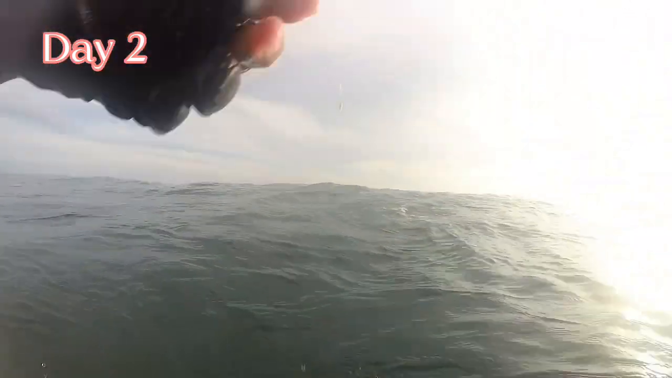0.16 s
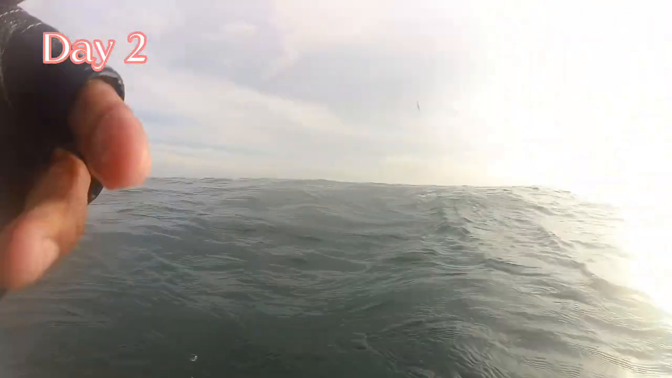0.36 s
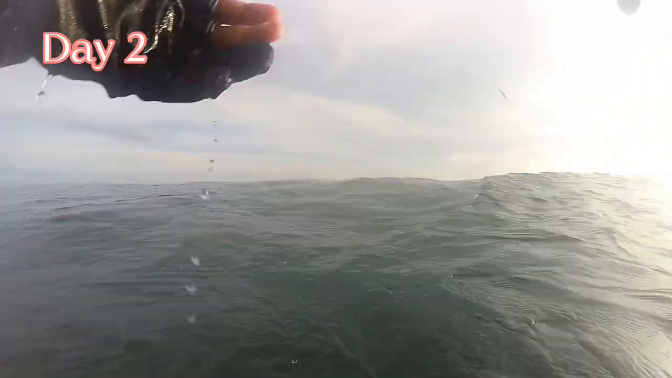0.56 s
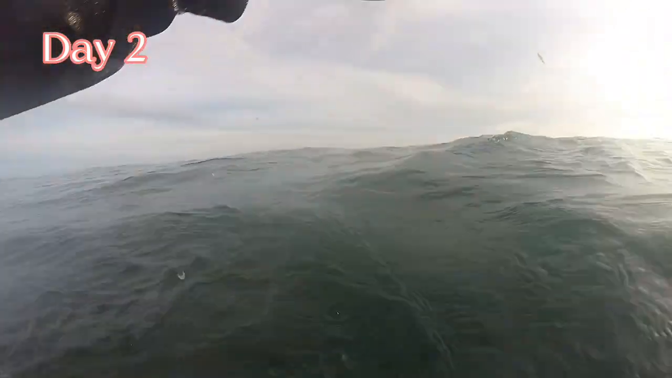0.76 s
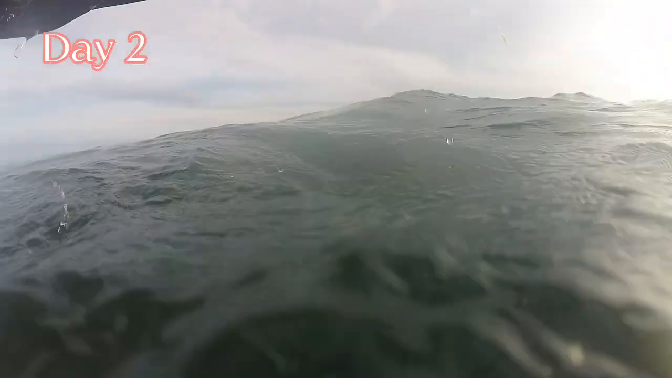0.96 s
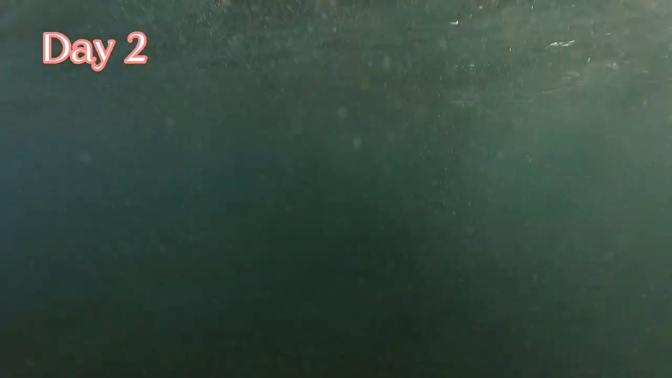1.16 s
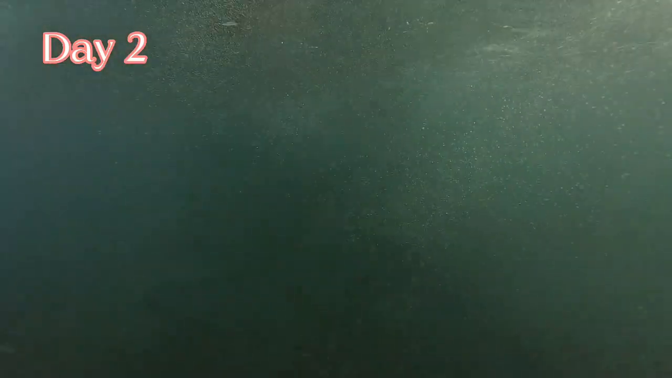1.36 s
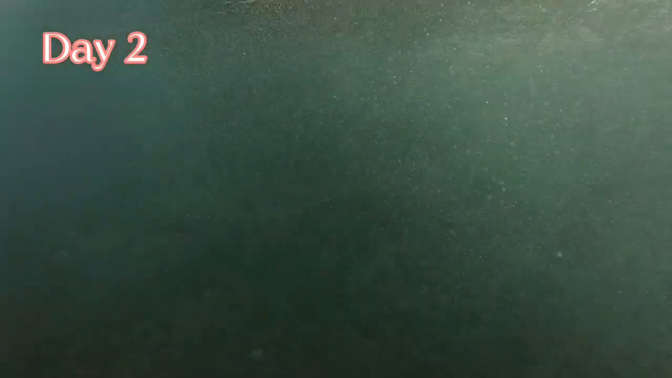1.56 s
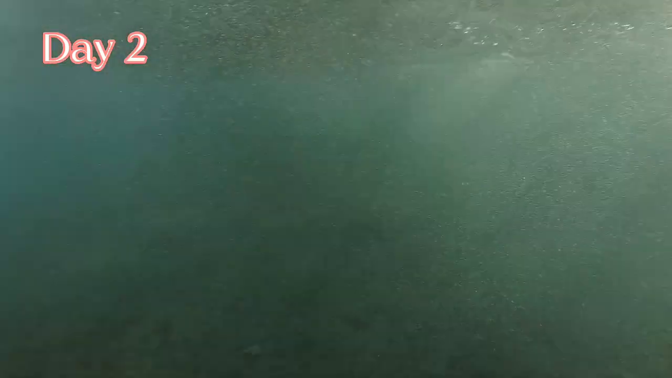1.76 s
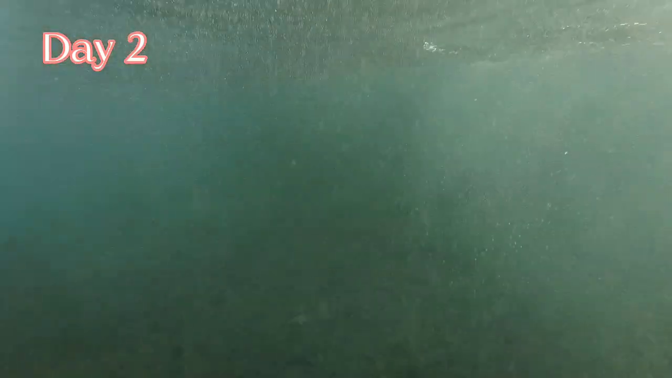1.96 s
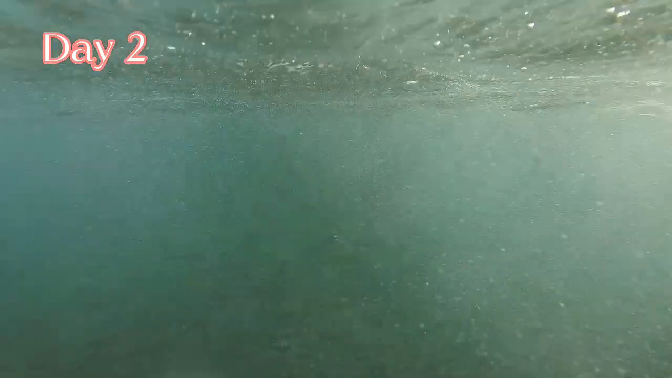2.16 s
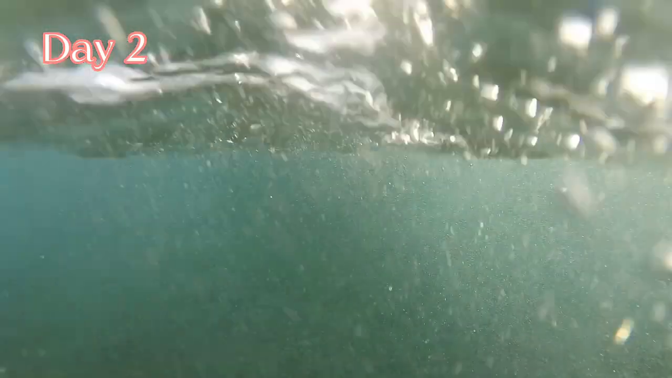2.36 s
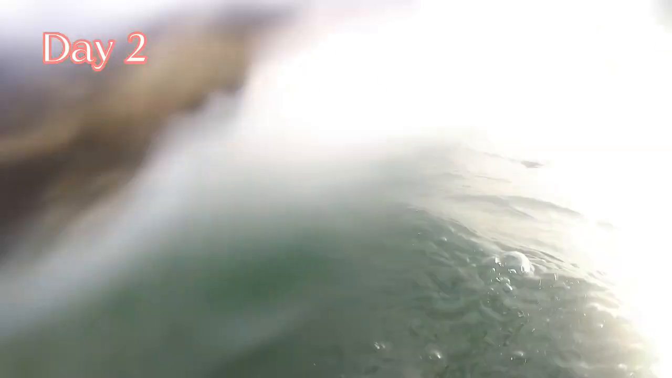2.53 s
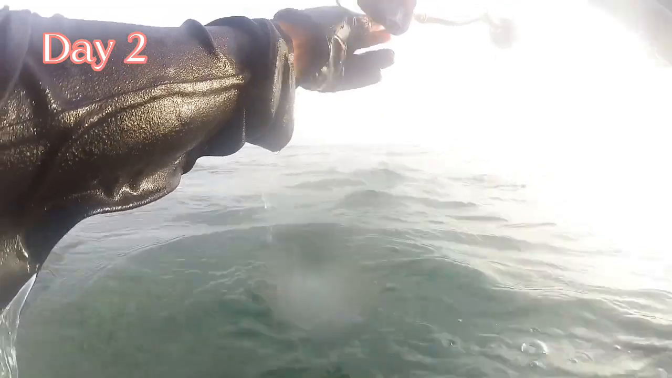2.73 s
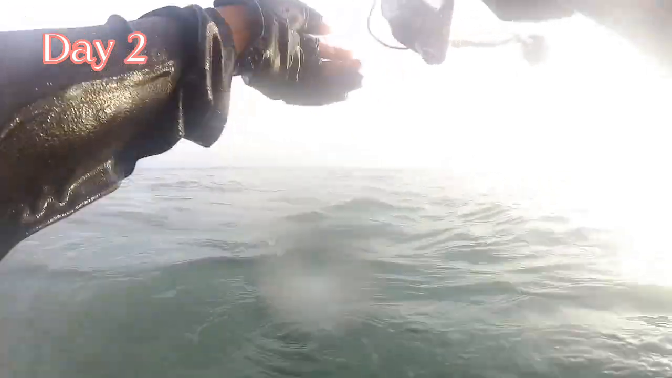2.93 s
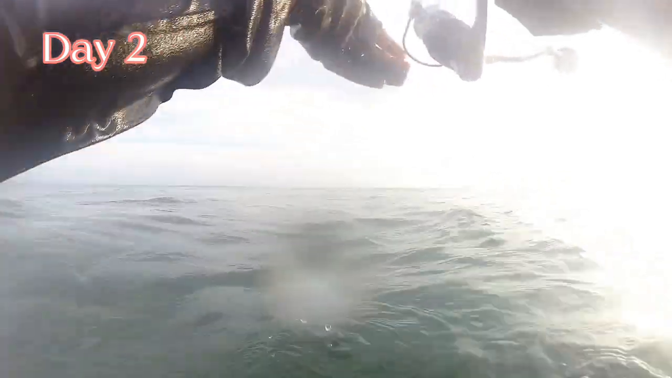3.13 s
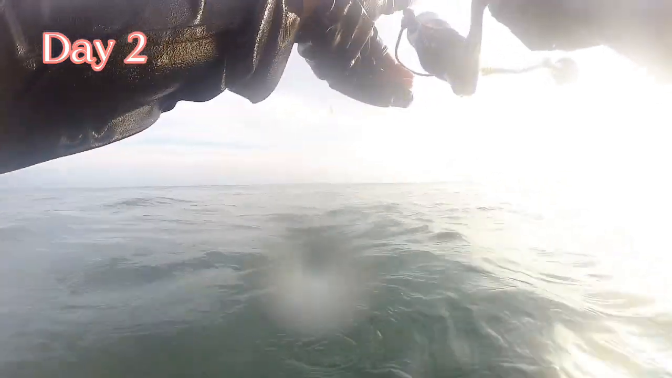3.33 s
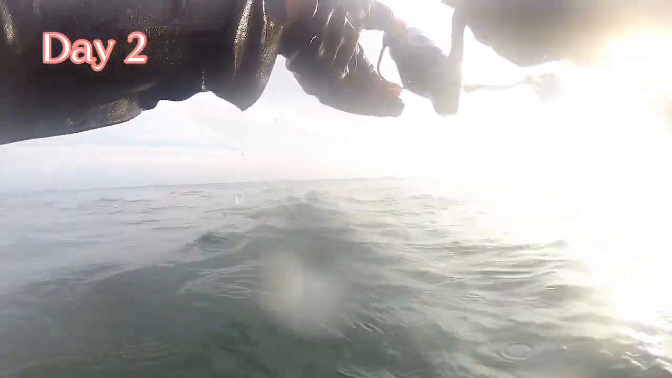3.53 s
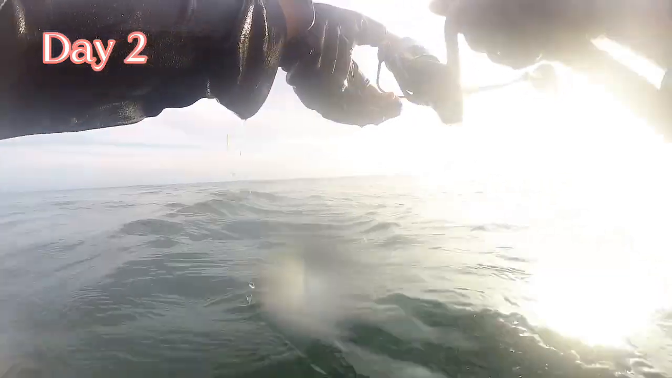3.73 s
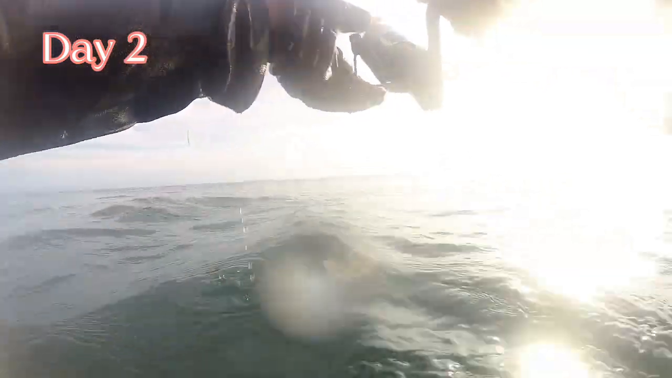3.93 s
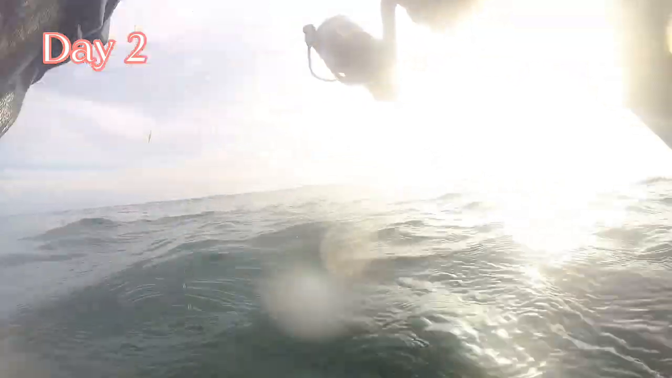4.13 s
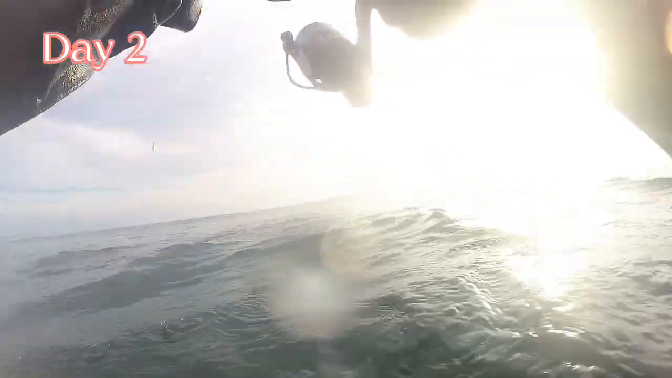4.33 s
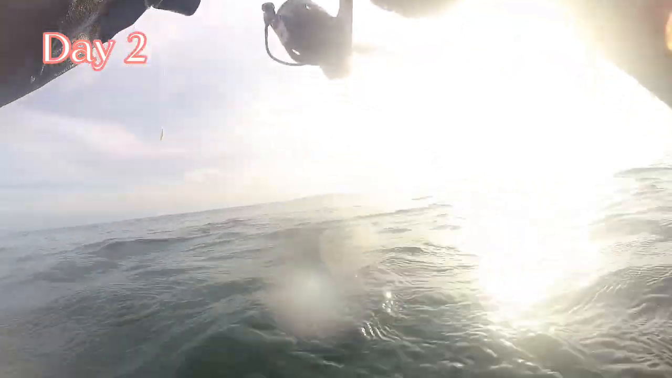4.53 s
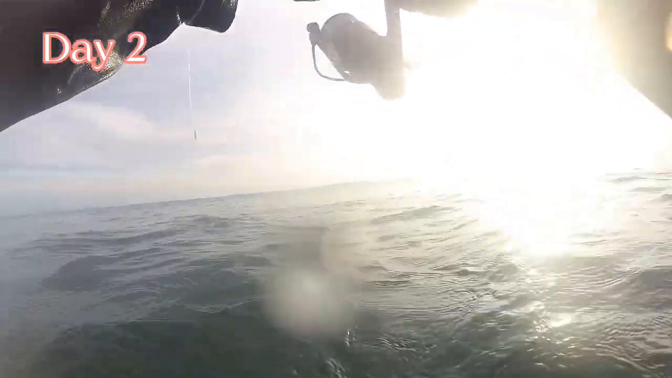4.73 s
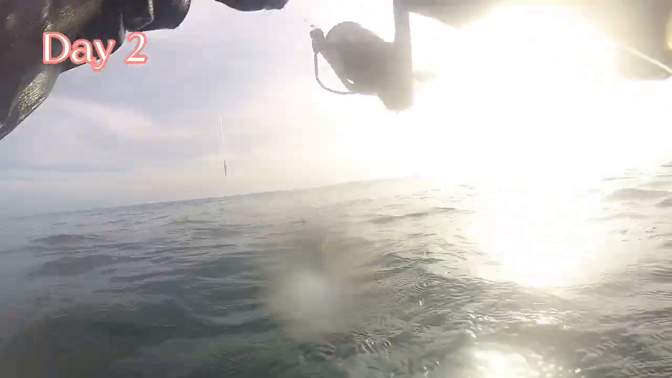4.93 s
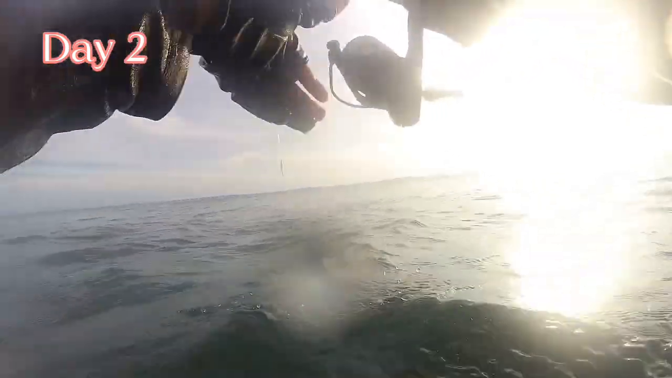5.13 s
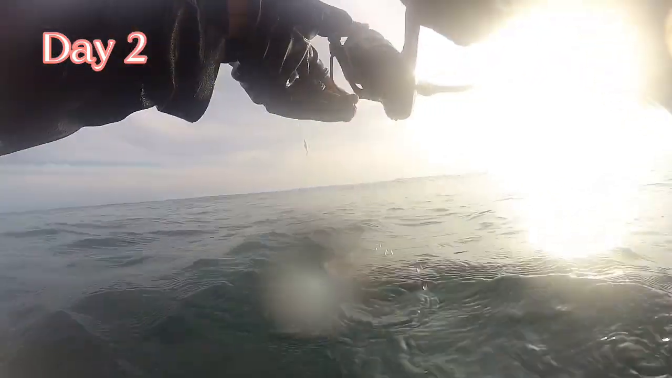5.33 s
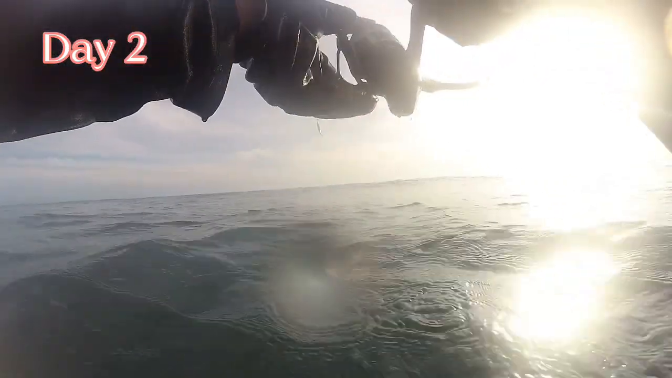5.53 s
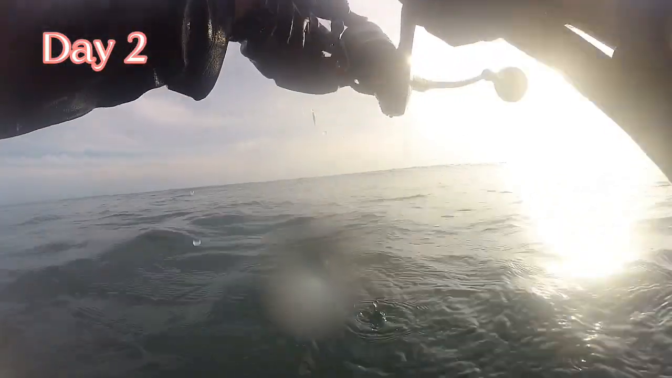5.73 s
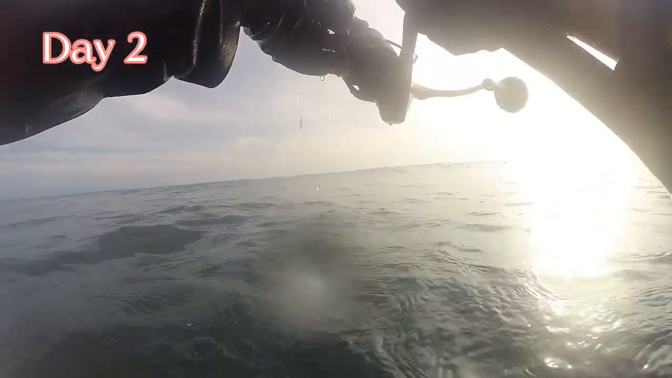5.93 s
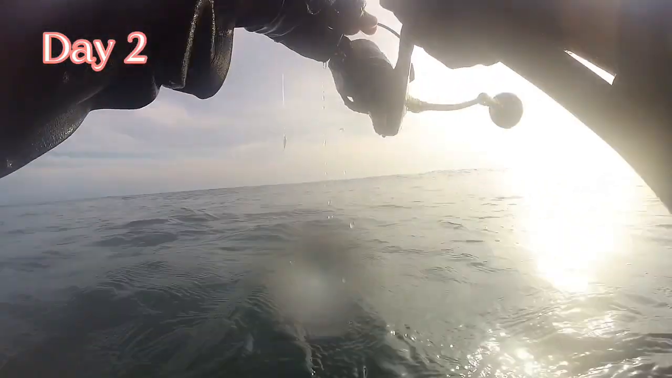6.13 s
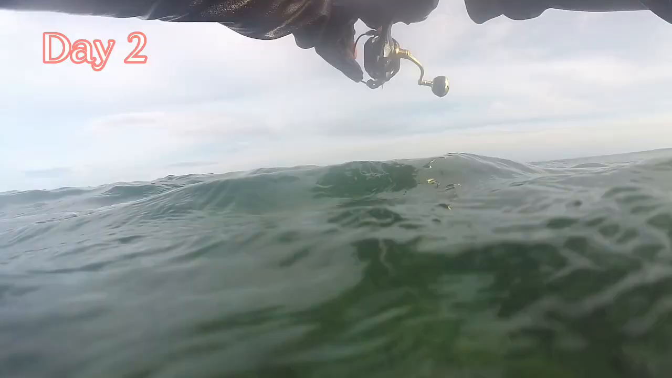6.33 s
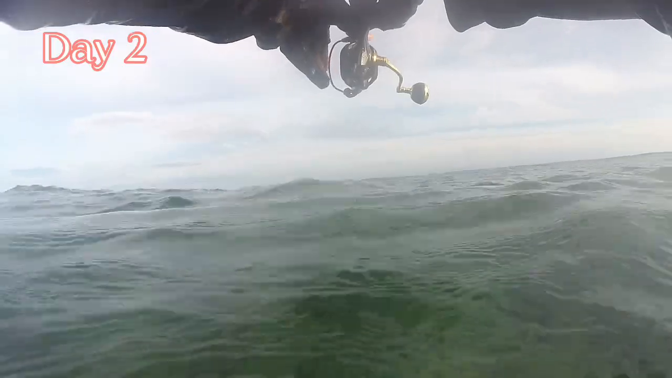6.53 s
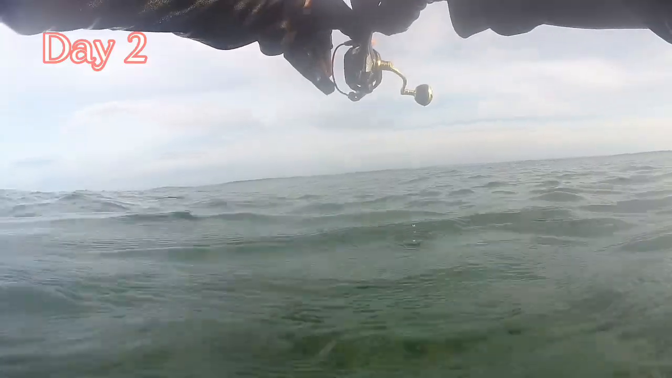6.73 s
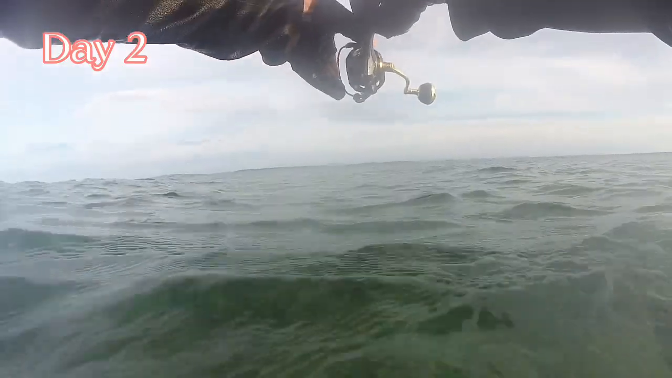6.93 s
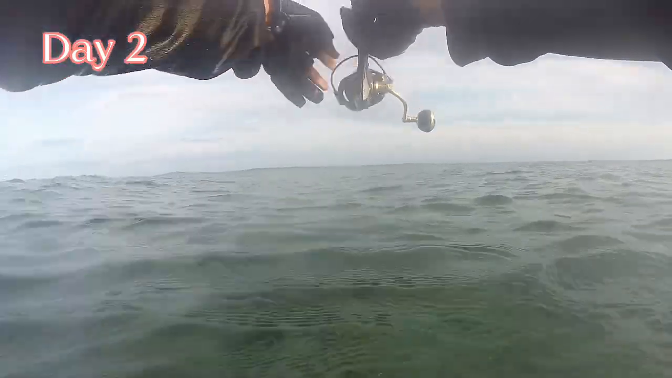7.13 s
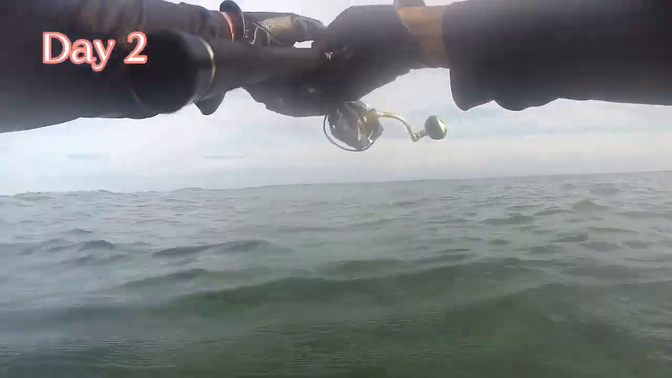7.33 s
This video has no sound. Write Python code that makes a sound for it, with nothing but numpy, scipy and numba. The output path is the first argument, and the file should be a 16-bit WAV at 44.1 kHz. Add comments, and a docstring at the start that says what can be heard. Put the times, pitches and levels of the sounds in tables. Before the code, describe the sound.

For the first second there is only a faint, dull sea wash and hiss with slow low swaying, stronger on the left, and tiny drips near 0.2 and 0.7 s. At about 1.0 s a wave buries the microphone: a sudden dense burst of foam and spray, then hollow bubbles ringing around 900 to 1200 Hz, hard low pressure blows that clip and distort, and deep thumps. From 1.7 to 2.4 s it is more submerged, with lower gurgling blubs; near 2.5 to 2.7 s heavy thumps and bubble pops mark the surfacing. From 2.9 s it is quiet, with sparse plinks and soft gurgles, clearest between 3.2 and 4.3 s, thinning after 5.3 s. At 6.27 s a crest slaps abruptly, thudding and overloaded mostly left, with brief fizz at right. Low sloshing lurches until about 6.8 s, then small left-side thumps and a last plink at 7.2 s.

```python
"""A small camera bobs at the sea surface over a faint sea hiss. At about 1 s a wave buries it: water pressing
on the two microphone ports drives the input into its rails, lumps of water thump, and trapped air bursts as
bubbles that ring the port cavities. From about 2.9 s it is up and dripping, in sparse quiet plinks. Near
6.3 s a later crest slaps it, and fine fizz drains off the right side. Heaves are smooth pressure humps,
bubbles and thumps are decaying gliding sines, and wash, slosh, spray and fizz are band-passed noise."""
import sys
import numpy as np
from scipy import signal
from scipy.io import wavfile
from scipy.ndimage import uniform_filter1d
from numba import njit

SR = 44100
rng = np.random.default_rng(int(sys.argv[2]) if len(sys.argv) > 2 else 0)


def wrap_up_sound(samples):
    """Save the sound to the file named by the first command line argument, as 16-bit audio."""
    columns = np.atleast_2d(samples).T
    # keep every value between -1 and 1, then stretch to whole-number steps
    tamed = np.clip(columns, -1, 1)
    steps = np.round(tamed * 32767).astype(np.int16)
    wavfile.write(sys.argv[1], SR, steps)


N = 325325
T = np.arange(N) / SR  # time in seconds
SIDES = np.array([[1], [-1]]) / 2  # splits a left-minus-right difference evenly over the two channels


def undb(db):
    """Decibel law: amplitude grows tenfold every 20 dB."""
    return 10 ** (np.asarray(db) / 20)


def unit(x):
    """RMS normalisation: each channel is scaled to an effective value of 1."""
    return x / np.sqrt(np.mean(x ** 2, axis=-1, keepdims=True))


def read(table):
    """Linear interpolation: the columns of a curve table, one value per sample."""
    s, *columns = np.transpose(table)
    return [np.interp(T, s, column) for column in columns]


def band(x, lo_hz, hi_hz, order=1):
    """Band-pass filtering: only the range between two corner frequencies passes freely."""
    return signal.sosfilt(signal.butter(order, [lo_hz, hi_hz], "band", fs=SR, output="sos"), x)


def lowpass(x, order, top_hz):
    """Low-pass filtering: the response falls off above a corner frequency."""
    return signal.sosfilt(signal.butter(order, top_hz, fs=SR, output="sos"), x)


def walk(rate, channels=1):
    """Slow random modulation: levels held for 1 / rate seconds, then slewed; RMS 1."""
    hold = int(SR / rate)
    levels = rng.standard_normal((channels, N // hold + 1))
    held = np.repeat(levels, hold, axis=1)
    return unit(uniform_filter1d(held, hold)[:, :N])


def pair(likeness):
    """Interchannel coherence: two noises correlate as far as they share a common part."""
    common, opposed = rng.standard_normal((2, N))
    c = np.clip(likeness, 0, 1)
    return (np.sqrt(1 + c) * common + np.sqrt(1 - c) * opposed * 2 * SIDES) / np.sqrt(2)


def swell(s, db, fade, rise):
    """Exponential growth and decay: gains climb to a peak at s and fade, in dB per s; one row per event."""
    late = T - np.reshape(s, (-1, 1))
    drop_db = np.where(late > 0, np.reshape(fade, (-1, 1)) * late, -rise * late)
    return undb(np.reshape(db, (-1, 1)) - drop_db)


@njit
def ring(n, start, hz, t60, rise, size, wobble, flutter, attack_cycles):
    """Bubble resonance: a decaying sine glides as the bubble changes size and wavers as its wall shakes."""
    out = np.zeros(n)
    for k in range(len(start)):
        length, phase = int(t60[k] * SR), 0.
        for i in range(min(length, n - start[k])):
            j = (start[k] + i + 977 * k) % n  # each bubble reads another stretch of the waver
            glide = rise[k] * np.tanh(3 * i / length)
            phase += 2 * np.pi * hz[k] * (wobble[j] + glide) / SR
            attack = min(1., i * hz[k] / (attack_cycles * SR))
            fade = np.exp(-np.log(1000) * i / length) * attack
            out[start[k] + i] += size[k] * flutter[j] * np.sin(phase) * fade
    return out


def sing(s, hz, t60, rise, sizes, rough=.05, apart=.025, flutter_db=3.5, attack_cycles=1.3):
    """Superposition: resonances add up at each port, with a slightly different pitch waver there."""
    wobble, flutter, *own = walk(220, channels=4)
    start = (s * SR).astype(np.int64)
    t60, rise = np.clip(t60, .005, .4), np.clip(rise, -.35, .75)
    return np.array([ring(N, start, hz, t60, rise, size, 1 + rough * wobble + apart * port_waver,
                          undb(flutter_db * flutter), attack_cycles)
                     for size, port_waver in zip(sizes, own)])


PORT_TOP_HZ = 2300  # cavity roll-off
# Resonances of the left, then the right port cavity. Each row: centre in Hz, width in Hz, level in dB.
PORT_MODES = [
    [(902, 200, 6.5), (550, 180, -14.5), (1470, 570, -11.5)],
    [(960, 1240, 3.5), (550, 450, -10), (1530, 400, -6.5)],
]


def ports(x):
    """Cavity resonance: each channel is coloured by the modes of its own port, which passes little treble."""
    coloured = []
    for channel, modes in zip(x, PORT_MODES):
        coloured.append(sum(undb(db) * band(channel, hz - w / 2, hz + w / 2) for hz, w, db in modes))
    return lowpass(coloured, 2, PORT_TOP_HZ)


HISS_DB = -62.5  # before its ticking
# Distant sea through the cavities. Each row: time in seconds, level in dB, left minus right in dB.
SEA_WASH = [(0, -47.5, 9), (.9, -48.5, 9.5), (3, -55.5, 1.5), (6.2, -54.5, 10.5), (6.4, -61, 4.5),
            (7.38, -65, -7.5)]


def sea():
    """Low-pass filtering by the ports: a smooth, dull far wash, with a faint ticking hiss beside it."""
    level_db, pan_db = read(SEA_WASH)
    dull = lowpass(ports(pair(0.19)), 4, 1700)
    wash = unit(dull) * undb(level_db + pan_db * SIDES + .8 * walk(14))
    hiss = unit(band(pair(.15), 1200, 9000)) * undb(HISS_DB + 2.5 * walk(45))
    return wash + hiss


SWAY_DB, SWAY_PAN_DB, SWAY_HZ = -24.5, 12, (2.95, 8)  # slow push of wind and swell throughout
# Water heaving against the ports, often hard enough to reach the rails. Each row: time of the crest in
# seconds, half length in seconds, left pressure and right pressure in units of full scale.
PRESSURE_HEAVES = [(1.213, .05, 2.2, 1.2), (1.28, .1, -1.7, -.7), (1.403, .035, -2, -1.4),
                   (1.432, .05, 1, 1), (1.5, .09, -1, -.8), (1.565, .05, 1.2, .3), (1.645, .06, 1.9, .85),
                   (1.75, .1, .6, .6), (1.838, .055, -1.9, -1.5), (1.9, .07, 1.6, .9),
                   (1.96, .05, -.8, -.6), (2.065, .07, -.85, -.45), (2.156, .07, 1.6, 1.05),
                   (2.275, .06, 1.9, .8), (2.375, .04, -1.4, -.5), (2.425, .06, -1.9, -.9),
                   (2.56, .07, 1.2, .6), (2.65, .08, -1.1, .4), (2.71, .06, .95, -.3), (2.845, .1, -1.1, 0),
                   (6.27, .022, -.9, -.2), (6.305, .04, -.5, .3), (6.343, .04, .9, .65),
                   (6.388, .05, -1.6, .3), (6.45, .11, 2, .45), (6.535, .06, -.9, .4), (6.585, .08, .8, .4),
                   (6.66, .06, -1.25, .15), (6.71, .07, .7, .1), (6.785, .09, -.5, 0)]


def heaves():
    """Quasi-static pressure: each heave is one smooth hump, over a slow sway that swells and eases at random."""
    sway = unit(band(pair(0.2), *SWAY_HZ, order=3))
    out = sway * undb(SWAY_DB + SWAY_PAN_DB * SIDES + 3.5 * walk(1.96))
    for s, half_length, left, right in PRESSURE_HEAVES:
        hump = np.cos(np.pi / 2 * np.clip((T - s) / half_length, -1, 1)) ** 2
        out = out + np.outer([left, right], hump)
    return out


# Water swirling over the ports, before its gusts. Each row: time in seconds, surge in dB, gurgle in dB
# above the surge, left minus right in dB.
SWIRL = [(0, -47.5, -1, 15.5), (.15, -40.5, -9, 10), (.5, -46.5, -7.5, 8), (.96, -47, -7, 6.5),
         (1.09, -9.5, -5, 10.5), (1.45, -13.5, -6, -1), (1.54, -6, -2.5, 0.5), (1.71, -18.5, -15, 7.5),
         (1.81, -13.5, -5.5, -9.5), (2.03, -7.5, -14, 8.5), (2.28, -18.5, -34, -6), (2.4, -19, -33.5, 3.5),
         (2.63, -4.5, -10, 9), (2.71, -10.5, -7.5, 10.5), (2.78, -11, -36, 19.5), (2.95, -37.5, -7.5, 1),
         (3.18, -41.5, -10, 0.5), (3.73, -43.5, -13.5, -3), (4.1, -38, -10.5, 3), (4.33, -41, -15, 2),
         (4.37, -32, -4.5, 4.5), (4.64, -36.5, -16, 0.5), (4.95, -38.5, -10.5, 3), (5.3, -44.5, -9, 0),
         (6.246, -41, -10, 5.5), (6.256, -11, -7, 7.5), (6.33, -14, -14, 12.5), (6.42, -19.5, -17.5, 26),
         (6.455, -28, -11.5, 4.5), (6.566, -12, -22.5, 16), (6.63, -30, -11, 17), (7.1, -35.5, -9.5, 20.5),
         (7.27, -43, -14, 7.5), (7.37, -30, -6.5, 18)]


def slosh():
    """Turbulent pressure: low noise lurches in gusts, mostly unrelated at the two ports."""
    level_db, gurgle_db, pan_db = read(SWIRL)
    surge = unit(band(pair(0.17), 16.9, 66.1, order=2)) * undb(5.17 * walk(11, channels=2))
    gurgle_noise = band(band(pair(0.25), 67, 290), 65, 530, order=2)
    gurgle = unit(gurgle_noise) * undb(gurgle_db + 5.17 * walk(30, channels=2))
    return (surge + gurgle) * undb(level_db + pan_db * SIDES)


THUMP_T60_S = 0.048
# Lumps of water that thump the housing. Each row: start in seconds, peak in dB, starting pitch in Hz,
# left minus right in dB.
WATER_LUMPS = [(0.966, -18, 117, 19), (1.109, -8, 180, 2), (1.385, -6, 250, -13.5), (1.575, -1, 104, -16),
               (1.854, -8, 109, -17), (1.938, -3.5, 145, -12), (2.044, .5, 103, -11),
               (2.314, -15.5, 101, -6), (2.586, 0.5, 119, 12.5), (2.62, 7, 143, 13), (2.688, -1.5, 106, -7),
               (4.353, -31, 137, 16), (6.253, -12, 101, 8), (6.285, -7.5, 330, 22.5), (6.291, -4, 103, 24),
               (6.311, -14, 425, 19), (6.403, -25, 100, 23.5), (6.554, -8, 117.5, 19.5),
               (6.74, -30.5, 211, 22.5), (6.79, -27.5, 277, 24.5), (6.953, -18.5, 221.3, 23.5),
               (7.088, -21, 191.4, 27.5)]


def thumps():
    """Heavily damped oscillation: a few low cycles that sag in pitch."""
    s, db, hz, pan_db = np.transpose(WATER_LUMPS)
    t60, sag = np.full(len(s), THUMP_T60_S), np.full(len(s), -.2)
    return sing(s, hz, t60, sag, undb(db + pan_db * SIDES), attack_cycles=.4)


# Fine fizz as the late crest drains off the right side.
FIZZ_S, FIZZ_DB, FIZZ_FADE_DB_PER_S = 6.265, -36.5, 63.5


def fizz(pan_db=-6.5):
    """Dense random superposition: tiny bubbles merge into a grainy, fading hiss in the low treble."""
    hiss = unit(band(pair(0.34), 1200, 2610, order=3))
    grain = undb(3.0 * walk(200, channels=2) + 2.0 * walk(40))
    envelope = swell(FIZZ_S, FIZZ_DB, FIZZ_FADE_DB_PER_S, 3000)
    return hiss * grain * envelope * undb(pan_db * SIDES)


FOAM_RISE_DB_PER_S = 1198
# Bursts of small bubbles round the housing. Each row: time of the peak in seconds, peak in dB,
# fade in dB per second, left minus right in dB.
FOAM_BURSTS = [(1.064, 3, 250, 1.5), (1.095, 5.5, 700, 0), (1.128, 1, 90, 0), (1.175, -3, 250, 4),
               (1.24, 4, 302, -3), (1.301, -2.5, 200, 7), (1.485, -5, 64, -3.5), (1.546, -3.5, 346, 6),
               (1.6, -9, 120, 3), (1.7, -19.5, 44.5, -2), (1.87, -20.5, 50, 4), (2.019, -15.5, 56, -4),
               (2.2, -25.5, 71, 0.5), (2.3, -21, 175, 6.5), (2.52, -25, 149.5, 6),
               (2.585, -20.5, 300, -0.5), (2.668, -14, 350, 6.5), (2.75, -45, 44.5, 10),
               (3.3, -57.5, 7.5, 9.5), (3.55, -50, 24.5, 8), (4.8, -57, 6, 11), (6.274, -18, 499.5, -1),
               (6.302, -18.5, 350, -1.5), (6.36, -31, 201, 3), (6.5, -45.5, 30, 16.5),
               (6.76, -47.5, 29.5, 17), (6.95, -46, 60.5, 18.5), (7.32, -52, 20.5, 19)]


def foam(count=3400, spray_slope=1.84, churn_slope=1.74):
    """Collective bubble sound in the cavities: churn and spray grow faster in dB than the bubbles do."""
    s, db, fade, pan_db = np.transpose(FOAM_BURSTS)
    gains = swell(s, db, fade, FOAM_RISE_DB_PER_S) + 1e-9
    level_db = 20 * np.log10(gains.max(axis=0))  # the loudest burst leads
    pan_db = pan_db @ gains / gains.sum(axis=0)  # position is weighted by gain

    when, pitch, glide, left_share = rng.random((count, 4)).T
    strength = undb(4.17 * np.minimum(rng.exponential(size=count), 4.5))
    hz = 520 * (2200 / 520) ** pitch
    sizes = strength * np.array([left_share, 1 - left_share])
    crowd = sing(when * N / SR, hz, 22 / hz, 0.11 * glide, sizes)
    body = unit(ports(crowd)) * undb(level_db + 1.9 * walk(22))

    churn_db = churn_slope * level_db - 7.0 + 6.1 * walk(70, channels=2)
    churn = unit(ports(pair(0.11))) * undb(churn_db)
    spray_db = spray_slope * level_db - 16.5 + 5.8 * walk(60) + 1.3 * walk(140, channels=2)
    spray = unit(band(pair(.2), 1300, 3900)) * undb(spray_db)
    return (body + churn + spray) * undb(pan_db * SIDES)


# Ring time: a share in cycles, a base, and more for a rising glide (less for a falling one).
BUBBLE_CYCLES, BUBBLE_T60_S, GLIDE_T60_S = 40, .01, .12
FILM_DAMPING = .4  # share of the ring time left once the late crest has wetted the ports
# Bubbles and drops at the ports. Each row: start in seconds, peak in dB, starting pitch in Hz, crack in dB
# above the peak, left minus right in dB (the crack takes half), share by which the pitch glides.
PORT_BUBBLES = [(.236, -29, 1640, -45, -17, -0.23), (.722, -33, 1570, -38, -8, -0.1),
                (.967, -13, 940, -32, 19, -0.22), (1.025, -14, 1570, -40, 0, -.05),
                (1.062, 2, 907, -9, 7, -0), (1.08, -6, 880, -11, 7, -0.3), (1.125, -2.5, 860, -15, 6, 0.3),
                (1.156, -2, 1040, 3.5, 7, -0), (1.18, 10, 1273, -5.5, 0.5, 0.11),
                (1.234, 8.5, 579.4, -12, 7.5, -0.09), (1.273, -7, 1100, 0, -13, 0.1),
                (1.294, 9, 976, -24, 3, 0.04), (1.313, 5, 1130, -12, -4, 0.16),
                (1.355, 2.5, 1154, -24, -2, 0.03), (1.387, -3, 1070, -20, -7.5, -0.15),
                (1.44, -7.5, 1132, -37, -2.5, 0.05), (1.479, 6, 1038, -23, -8, -0.02),
                (1.5, -6.5, 1130, -14, -10, .16), (1.528, 7, 1124, -15, -9, -0.05),
                (1.545, 4, 998, -12, -14, 0.05), (1.598, 4, 1200, -14.5, 0, .06),
                (1.675, 0.5, 1080, -25, -11.5, -0.16), (1.734, -8, 737, -32, -2.5, 0.04),
                (1.78, -15, 594, -40, -10, 0.3), (1.859, -11.5, 444, -45, -5, 0.19),
                (1.939, -4, 544, -10, -10.5, 0.14), (1.985, -12.5, 664, -39, -12.5, 0.16),
                (2.009, -5, 630, -24, -15.5, 0.4), (2.04, -10.5, 1062, -15, -9, 0.12),
                (2.075, -8.5, 507, -43, -1, -0.06), (2.109, -18, 578, -38, 2, 0.16),
                (2.198, -14.5, 535, -36, 8.5, 0.2), (2.236, -13.5, 1096, -35, -2, 0.3),
                (2.302, -11.5, 772, -22.5, -4.5, 0.34), (2.322, -14, 852, -36, -1, .15),
                (2.345, -17, 900, -40, 0, .15), (2.501, -24, 712, -45, 6, .1),
                (2.517, -2, 825, -26, 10, 0.7), (2.585, -6, 445, -5.5, -15, -0.3),
                (2.666, 0, 1014, -9.5, 16, -0.02), (2.683, -2, 524, -19.5, -8.5, -0.3),
                (2.843, -28.5, 1710, -39, 0, 0.16), (2.883, -23.5, 1050, -43.5, 7, 0.19),
                (2.955, -40, 877, -26, 14, 0.25), (2.988, -34.5, 1700, -32, -1.5, -0.04),
                (3.064, -37, 1390, -36, 1, .05), (3.185, -40, 1620, -36, -3, .01),
                (3.26, -35, 1790, -4, -11.5, -0.08), (3.287, -27, 1260, -40, 9.5, 0.02),
                (3.329, -36, 1630, -39, -9.5, 0.12), (3.346, -29, 1020, -34.5, 12.5, 0.07),
                (3.372, -32, 1510, -14.5, -0.5, -0), (3.402, -34.5, 873, -39, 8.5, .12),
                (3.464, -35, 1250, -36, 11.5, 0.12), (3.534, -32, 970, -38, 10.5, 0.16),
                (3.554, -26, 964, -52, 12, -0.09), (3.582, -33.5, 640, -38, 6, -0.03),
                (3.63, -39, 820, -32.5, 7.5, .5), (3.762, -36, 950, -30, 9.5, 0.66),
                (3.803, -32, 748, -37, 10, 0.17), (3.826, -39, 677, -26, 11.5, .35),
                (3.923, -42.5, 1483, -36.5, 10, 0.07), (4.058, -30.5, 724, -33, 15.5, .67),
                (4.094, -28, 802, -51, 11.5, 0.59), (4.113, -39, 785, -31, 15.5, 0.52),
                (4.194, -31.5, 1048, -4, 9.5, 0.1), (4.268, -20.5, 954, -42, 12, -0.14),
                (4.739, -33, 1746, -35, -2, -0), (4.788, -35.5, 944, -27, 13, 0.2),
                (4.854, -29, 726, -25.5, 14, 0.28), (4.919, -41.5, 913, -26, 15, 0.4),
                (4.96, -38, 1210, -33.5, 13, -0.16), (5.09, -40.5, 1490, -31, 2, .06),
                (5.239, -44, 1746, -23.5, 8.5, -0.06), (5.288, -35, 1085, -36, 10.5, -0.04),
                (6.273, -3, 875, -9, 10, -.1), (6.274, -3, 2150, -12, -3, .02),
                (6.302, 0, 1493, -20.5, -2.5, 0), (6.361, -12, 706, -25, 17.5, -0.04),
                (6.447, -28, 1560, -26, -24, 0), (6.608, -24.5, 627, -37, 25, 0.18),
                (6.65, -21, 485, -10.5, 25.5, -0.06), (7.187, -23, 1696, -8.5, -5, 0.06)]


def bubbles(crack_s=0.0024, cavity_db=-3.5):
    """Impulsive excitation: each bursts with a short crack, sings its own pitch and kicks the cavities."""
    s, db, hz, crack_db, pan_db, rise = np.transpose(PORT_BUBBLES)
    t60 = BUBBLE_CYCLES / hz + BUBBLE_T60_S + GLIDE_T60_S * rise
    t60 = t60 * np.where(s > FIZZ_S, FILM_DAMPING, 1)
    start = (s * SR).astype(np.int64)
    sizes = undb(db + pan_db * SIDES)
    kicks, cracks = np.zeros((2, 2, N))
    kicks[:, start] = sizes
    cracks[:, start] = undb(db + crack_db + pan_db * SIDES / 2)
    decay = [1, -np.exp(-1 / (crack_s * SR))]  # turns each impulse into an exponential fade
    noise = pair(0.31)
    cavity = ports(signal.lfilter([1], decay, kicks) * noise) * undb(cavity_db)
    crack = unit(band(noise, 1000, 3700)) * signal.lfilter([1], decay, cracks)
    return sing(s, hz, t60, rise, sizes) + cavity + crack


def scene():
    """Linear superposition: the pressures of all sources add at the ports."""
    return sea() + heaves() + slosh() + thumps() + fizz() + foam() + bubbles()


RAIL, LEAK_DB = 0.92, -32  # clipping level as a share of full scale; slope left beyond the rails
MIC_TOP_HZ, TREBLE_DB, TOP_HZ = 7230, -6, 15800  # capsule limit, treble level above it, output limit


def record(dry):
    """Nonlinear distortion: the capsules roll off, the input clips at its rails, and the treble is dulled."""
    steep = signal.ellip(8, .5, 60, MIC_TOP_HZ, fs=SR, output="sos")
    heard = signal.sosfilt(steep, dry)
    clipped = np.clip(heard, -RAIL, RAIL)
    clipped = clipped + undb(LEAK_DB) * (heard - clipped)  # the rails give a little
    split = signal.butter(8, 0.97 * MIC_TOP_HZ, fs=SR, output="sos")
    low = signal.sosfiltfilt(split, clipped)
    dulled = low + undb(TREBLE_DB) * (clipped - low)
    output_filter = signal.ellip(3, .2, 12, TOP_HZ, fs=SR, output="sos")
    return np.clip(signal.sosfilt(output_filter, dulled), -1, 1)


dry = scene()
out = record(dry)
wrap_up_sound(out)
```